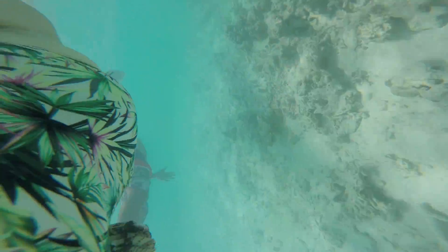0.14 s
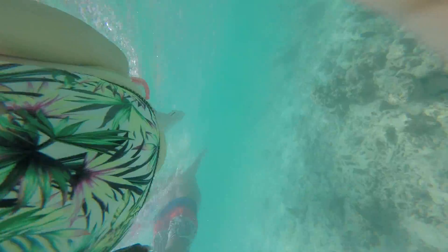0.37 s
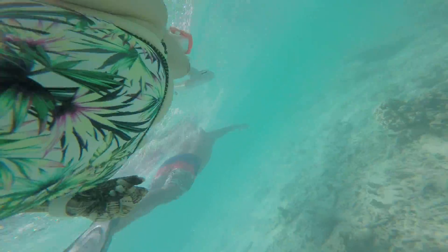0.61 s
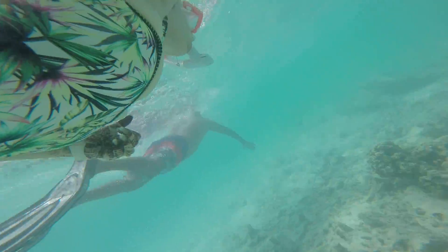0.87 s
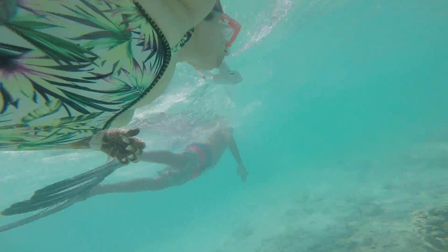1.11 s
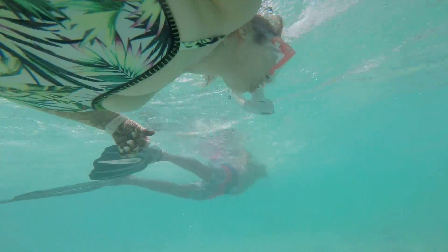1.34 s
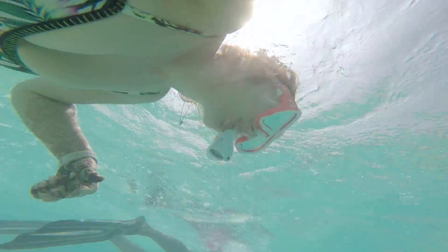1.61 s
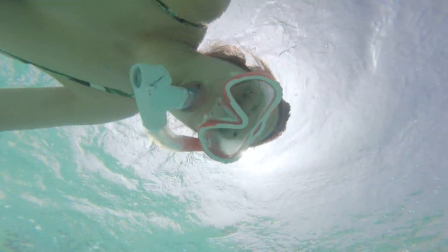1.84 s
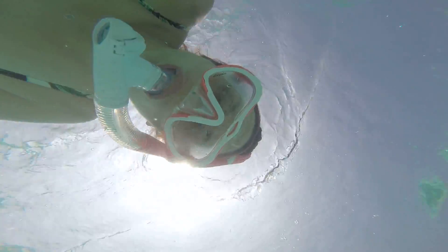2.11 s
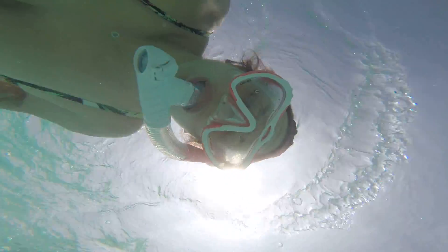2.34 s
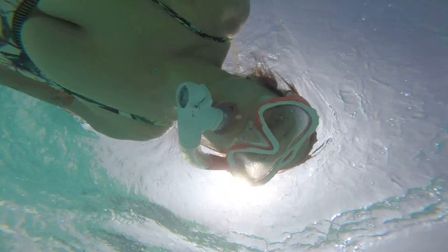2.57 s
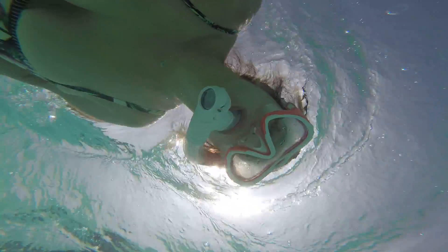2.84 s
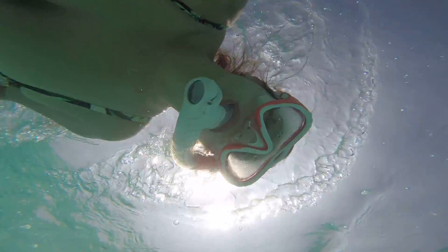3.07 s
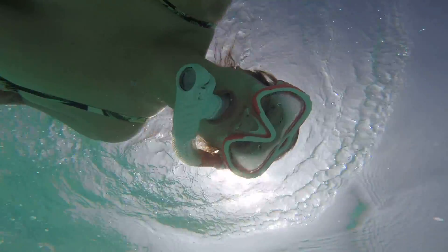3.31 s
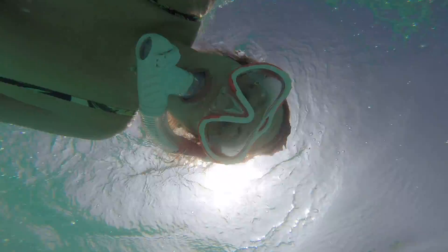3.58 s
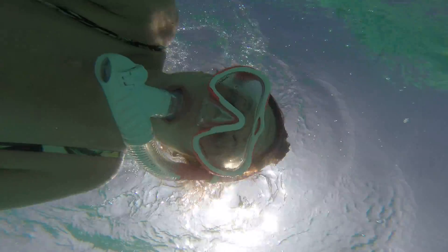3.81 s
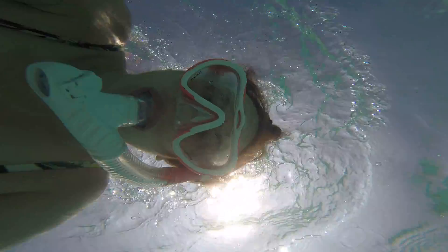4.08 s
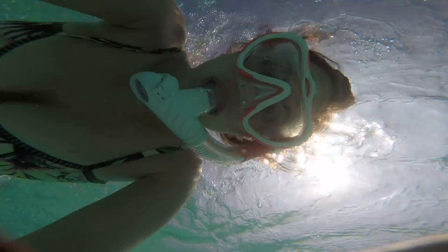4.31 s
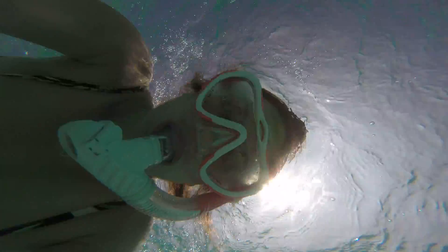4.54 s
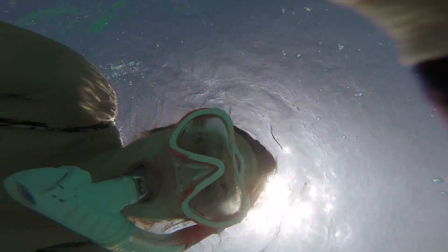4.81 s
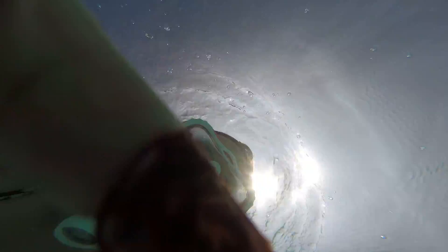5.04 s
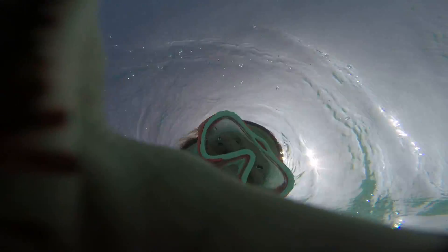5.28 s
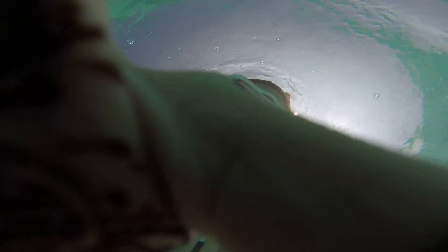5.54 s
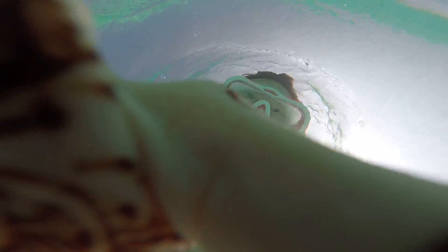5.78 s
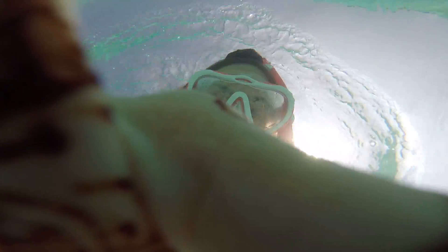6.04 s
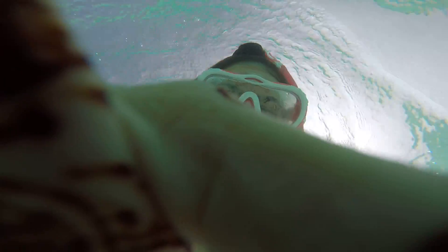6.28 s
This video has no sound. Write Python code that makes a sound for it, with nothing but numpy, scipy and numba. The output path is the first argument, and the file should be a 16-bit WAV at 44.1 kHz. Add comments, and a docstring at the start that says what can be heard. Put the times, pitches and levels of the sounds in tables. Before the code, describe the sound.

A small sealed camera is swung about under the sea surface. A dense, hollow gurgle opens with a rub and low rush, then thins by one second as hard knocks hit the case. Quieter bubble blips and watery wash follow, until heavy thumps and clacks near four seconds. Bubbling swells again after five seconds, with a rub and one sharp knock. Everything is muffled, close and boxy.

```python
"""Bubbles and fizz reach the microphone of a small camera that a swimmer swings about under the sea surface.
They are swarms of damped, rising tones; most of them pass through the resonances of the sealed housing.
Swirling water is gusty low noise, and pushes on the membrane are slow bumps that swing back past rest.
Knocks ring the modes of the case under a crack, brushes are short bursts of coloured noise, and the
electronics whine in faint sines. A limiter ducks the loud moments and the hardest peaks clip."""
import sys
import numpy as np
from scipy import signal
from scipy.fft import rfft, irfft, next_fast_len
from scipy.io import wavfile
from scipy.ndimage import uniform_filter1d
from numba import njit

SR = 44100
rng = np.random.default_rng(int(sys.argv[2]) if len(sys.argv) > 2 else 0)


def wav_record(signal):
    """Record a signal, one row per channel, as 16-bit PCM in the file named by sys.argv[1]."""
    frames = np.transpose(np.atleast_2d(signal))
    bounded = np.clip(frames, -1, 1)
    # unit amplitude maps onto the largest positive 16-bit level
    quanta = np.round(bounded * 32767).astype(np.int16)
    wavfile.write(sys.argv[1], SR, quanta)


def how_loud(loudness_db):
    """Turn decibels into a plain amplitude multiplier (0 dB gives 1, 20 dB gives 10)."""
    steps = np.asarray(loudness_db, float) / 20
    return 10 ** steps


N = 282223  # samples in the scene


def level(x, db):
    """Scale to an rms level."""
    return x * how_loud(db) / np.sqrt(np.mean(x ** 2))


def coloured(spectrum):
    """Noise shaped to a spectrum drawn over log frequency, rms 1."""
    hz, db = np.transpose(spectrum)
    size = next_fast_len(N)
    bin_hz = np.arange(size // 2 + 1) * SR / size + 1e-3  # keeps the log finite at 0 Hz
    gain = how_loud(np.interp(np.log(bin_hz), np.log(hz), db))
    white = rng.standard_normal(size)
    return level(irfft(rfft(white) * gain, size)[:N], 0)


def walk(rate):
    """Random levels, each held 1 / rate s, then smoothed twice into a wander with a spread near 1."""
    hold = int(SR / rate)
    steps = np.repeat(rng.standard_normal(N // 50)[:N // hold + 1], hold)
    return 1.3 * uniform_filter1d(uniform_filter1d(steps, hold), hold)[:N]


def hump(t, rise, fall):
    """A bell with its own rise and fall widths, 1 at t = 0."""
    return np.exp(-.5 * (t / np.where(t < 0, rise, fall)) ** 2)


@njit
def ring(n, at, hz, size, t60, glide, rise):
    """Damped tones that swell over rise s and slide in pitch by the share glide during their t60."""
    out = np.zeros(n)
    for k in range(len(at)):
        start, length, phase = int(at[k] * SR), int(t60[k] * SR), 0.
        for i in range(min(length, n - start)):
            phase += 2 * np.pi * hz[k] * (1 + glide * i / length) / SR
            decay = 1000. ** (-i / length)
            swell = 1 - np.exp(-i / (rise * SR))
            out[start + i] += size[k] * np.sin(phase) * decay * swell
    return out


# water around the case, as breakpoints; the two bubble supplies are trimmed again for each bubble size:
# time_s [s], large_bubbles_db [dB], fine_bubbles_db [dB], flow_past_membrane_db [dB]
WATER_COURSE = [(0.0, -35.5, -42, -29.5), (0.16, -39.5, -49.5, -42), (0.3, -39.5, -46.5, -43),
                (0.48, -40.5, -52.5, -38.5), (1.0, -55.5, -53, -40), (1.14, -64, -55.5, -37),
                (1.32, -56, -57, -47.5), (1.49, -46.5, -56.5, -43), (1.69, -46, -52.5, -42),
                (2.07, -45, -47.5, -38.5), (2.42, -43.5, -47.5, -39), (2.58, -47, -51, -45.5),
                (2.78, -56.5, -52, -43.5), (3.12, -45.5, -47, -37.5), (3.33, -56.5, -54, -35.5),
                (3.56, -54, -53, -44), (3.83, -50.5, -56.5, -31.5), (3.94, -55, -45.5, -33.5),
                (4.13, -47, -55.5, -42.5), (4.37, -47.5, -51.5, -62), (4.51, -47, -57, -46),
                (4.7, -49.5, -55, -40.5), (4.94, -48, -63, -40.5), (5.08, -46, -58, -36.5),
                (5.22, -38.5, -48, -37), (5.38, -39, -49.5, -36), (5.69, -46, -47, -40.5),
                (5.92, -49.5, -50.5, -44.5), (6.15, -39.5, -52, -47.5), (6.4, -44, -54, -42.5)]


def water_course():
    """Levels of large bubbles, fine bubbles and flow, gliding between the breakpoints."""
    time_s, *columns = np.transpose(WATER_COURSE)
    return [np.interp(np.arange(N) / SR, time_s, column) for column in columns]


# resonances of the sealed housing: pitch_hz [Hz], width_hz [Hz], level_db [dB, relative]
HOUSING_RESONANCES = [(711, 81, -6.5), (1800, 430, -12), (2498, 324, -5.5), (4340, 1060, -19),
                      (6390, 730, -16.5), (10400, 1400, -24)]


def housing(x):
    """The sealed air and walls of the housing pass sound mostly at their resonances."""
    out, sign = 0, 1
    for hz, width_hz, db in HOUSING_RESONANCES:
        out = out + sign * how_loud(db) * signal.lfilter(*signal.iirpeak(hz, hz / width_hz, SR), x)
        sign = -sign  # neighbouring resonances answer in opposite phase
    return out


def swarm(patches, count, low_hz, high_hz, cycles, spread_db, patchy_db):
    """Bubbles of random size and moment, rising in pitch; patches sway their level by patchy_db."""
    at, pitch, size = rng.random((count, 3)).T
    hz = low_hz * (high_hz / low_hz) ** pitch
    patch = patches[(at * (N - 1)).astype(int)]
    sizes = how_loud(-spread_db * np.log(1 - .998 * size) + patchy_db * patch)
    return ring(N, at * N / SR, hz, sizes, cycles / hz, 0.35, 0.00015)  # smaller ones die away sooner


# colour of the far wash: pitch_hz [Hz], density_db [dB per Hz, relative]
WASH_SPECTRUM = [(530, -12.5), (900, -0.5), (1160, -24.5), (1820, -7.5), (2020, -25), (2360, -7),
                 (2860, -23), (10300, -35), (14400, -42.5), (15500, -47)]


def wash(clouds):
    """Far wash: coloured noise that sways with the clouds of fine bubbles."""
    return coloured(WASH_SPECTRUM) * how_loud(-53 + 1.4 * clouds)


def bubbling(large_db, fine_db):
    """Four sizes of bubbles: gurgle is steady, large follow one supply, small and fizz the other."""
    slosh = walk(14)
    clouds = .7 * (walk(24) + walk(70))
    gurgle = swarm(slosh, count=500, low_hz=142.4, high_hz=461, cycles=17.5, spread_db=2.2, patchy_db=-2.0)
    large = swarm(slosh, count=1700, low_hz=407.7, high_hz=1169, cycles=46.0, spread_db=-0.5, patchy_db=0.5)
    small = swarm(clouds, count=5000, low_hz=1157, high_hz=3198, cycles=55.5, spread_db=3.0, patchy_db=4.0)
    fizz = swarm(clouds, count=20000, low_hz=2927, high_hz=13300, cycles=25, spread_db=3.5, patchy_db=2.5)
    snaps = swarm(clouds, count=250, low_hz=4000, high_hz=13000, cycles=5, spread_db=2.5, patchy_db=2.4)
    fine = level(housing(fizz), 0) + level(housing(snaps), -18)
    out = level(gurgle, -54)
    out = out + how_loud(large_db + 2) * level(housing(large), 0)
    out = out + how_loud(fine_db - 1.1) * level(housing(small), 0)
    out = out + how_loud(fine_db - 9) * fine
    return out + wash(clouds)


# colour of the swirl: pitch_hz [Hz], density_db [dB per Hz, relative]
SWIRL_SPECTRUM = [(8.8, -55), (15, 8), (70, -7), (141, -15.5), (189, -25), (300, -24), (390, -26.5),
                  (660, -120)]


def swirl(flow_db):
    """Water swirling past pushes on the membrane as low noise; its eddies come in gusts."""
    return coloured(SWIRL_SPECTRUM) * how_loud(flow_db + 3.4 * walk(24))


# tones of the circuit: pitch_hz [Hz], level_db [dB rms before the swell], swell_db [dB]
WHINES = [(5844, -83, 1), (8781, -83, 4), (11688, -93, 0), (11718, -93, 0), (14625, -97, 0)]


def electronics():
    """Thin sines of the circuit; some swell once."""
    t = np.arange(N) / SR
    swell = hump(t - 3.3, .45, .45)
    out = np.zeros(N)
    for hz, db, swell_db in WHINES:
        out += np.sqrt(2) * how_loud(db + swell_db * swell) * np.sin(2 * np.pi * hz * t)
    return out


# colour of the rubbing: pitch_hz [Hz], density_db [dB per Hz, relative]
BRUSH_SPECTRUM = [(320, -61), (550, -10.5), (707, -3), (1000, -21), (1220, -20), (1660, -19), (2520, -19),
                  (2860, -27), (6250, -34), (7500, -42.5), (9910, -42.5), (14500, -56), (15500, -69)]
# something brushes the case: peak_s [s], level_db [dB before the grit], rise_s [s], fall_s [s]
BRUSH_STROKES = [(0.028, -30, 0.035, 0.019), (.501, -36.5, 0.0087, 0.011), (.76, -45, 0.073, .015),
                 (1.07, -38.5, 0.0067, 0.0055), (1.123, -44, 0.013, 0.01), (3.06, -49.5, 0.016, 0.035),
                 (3.735, -47.5, 0.048, .01), (3.916, -33, 0.0064, 0.0081), (4.29, -46, 0.068, 0.01),
                 (4.579, -44, 0.0056, .012), (4.901, -43.5, .02, 0.029), (5.079, -33.5, 0.049, 0.049),
                 (5.19, -45, 0.013, 0.022), (5.714, -43.5, 0.012, 0.015), (5.849, -42, 0.0066, 0.0028)]


def brushes():
    """Short gritty rubs along the case: coloured noise with an unsteady level."""
    t = np.arange(N) / SR
    strokes = sum(how_loud(db) * hump(t - peak_s, rise_s, fall_s) for peak_s, db, rise_s, fall_s in BRUSH_STROKES)
    return coloured(BRUSH_SPECTRUM) * how_loud(1.2 * walk(82)) * strokes


# bubbles that stand out: start_s [s], level_db [dB, relative], pitch_hz [Hz at the start],
# t60_s [s, held within limits when played]
CLOSE_BUBBLES = [(0.014, -18, 260, 0.014), (0.023, -29.5, 1726, 0.066), (0.053, -29, 440, 0.1),
                 (0.0682, -22, 2610, 0.0084), (0.092, -25, 825, 0.019), (0.127, -38, 2430, .016),
                 (0.129, -36.5, 457, 0.29), (0.131, -23, 713, 0.027), (0.156, -37, 3560, .014),
                 (0.182, -34.5, 3430, 0.012), (0.17, -39, 2300, .025), (0.2175, -27, 792, 0.046),
                 (0.249, -31.5, 362, 0.077), (0.251, -27.5, 599, .1), (0.3057, -36, 1800, 0.049),
                 (0.3257, -32.5, 2345, 0.032), (0.3521, -34, 2260, 0.047), (0.3765, -30.5, 1280, .025),
                 (0.413, -32.5, 1800, 0.022), (0.508, -15, 693, .05), (0.547, -28, 644, 0.11),
                 (0.687, -17, 590, 0.014), (0.79, -42.5, 3800, .015), (0.83, -34.5, 800, .07),
                 (0.89, -44, 4100, 0.027), (0.906, -36.5, 677, 0.14), (1.1194, -25.5, 2410, 0.0097),
                 (1.1267, -33, 3330, .012), (1.429, -37.5, 240, .036), (1.6177, -23.5, 2370, 0.009),
                 (1.653, -27.5, 696, 0.04), (1.715, -32, 745, 0.057), (1.719, -37.5, 280, 0.13),
                 (1.8218, -32, 2180, 0.019), (2.041, -30, 783, .042), (2.235, -31, 605, 0.065),
                 (2.2588, -34, 2350, .073), (2.3486, -37, 3700, 0.015), (2.404, -24.5, 762, .029),
                 (2.4269, -32, 2445, .035), (2.439, -22, 866, 0.028), (2.455, -31.5, 783, 0.17),
                 (2.566, -30.5, 790, 0.065), (2.858, -28, 670, 0.052), (2.8659, -38.5, 1850, .03),
                 (2.97, -32.5, 934, 0.036), (3.1093, -35, 4320, 0.012), (3.2869, -33.5, 2440, 0.063),
                 (3.1348, -39, 1560, 0.03), (3.655, -38.5, 2170, 0.065), (3.663, -43, 1880, .06),
                 (3.74, -24, 621, 0.093), (3.824, -28, 660, 0.046), (4.092, -23.5, 577, 0.078),
                 (4.334, -30, 772, 0.052), (4.425, -27, 700, 0.082), (4.4618, -21.5, 2120, 0.0094),
                 (4.4877, -39, 1780, 0.047), (4.711, -29, 664, 0.051), (4.95, -29, 714, 0.066),
                 (5.1, -27, 711, 0.16), (5.222, -39, 1800, .06), (5.2345, -34, 2620, .015),
                 (5.2839, -30, 2480, 0.016), (5.323, -40, 2560, 0.043), (5.4216, -35.5, 2530, 0.058),
                 (5.6261, -34, 2450, 0.03), (5.672, -22.5, 2530, 0.029), (5.7663, -37.5, 2420, 0.022),
                 (5.8117, -28.5, 2240, 0.026), (5.919, -28.5, 756, .06), (5.947, -23.5, 692, 0.063),
                 (5.959, -26.5, 668, 0.099), (5.9843, -36.5, 3070, 0.019), (6.0482, -42, 3340, .013),
                 (6.064, -40.5, 3300, 0.023), (6.16, -33, 690, 0.033), (6.1804, -33, 2630, 0.023),
                 (6.259, -29, 827, 0.067), (6.3415, -33, 2580, 0.031)]


def bubbles():
    """Single bubbles close to the microphone: damped tones that rise a little in pitch."""
    start_s, db, hz, t60_s = np.array(CLOSE_BUBBLES, float).T.copy()
    return ring(N, start_s, hz, how_loud(db + 3), np.clip(t60_s, .004, .3), 0.11, 0.00099)


# pushes on the membrane: peak_s [s], peak [share of full scale, minus = outward],
# rise_ms [ms], fall_ms [ms], rebound_ms [ms]
MEMBRANE_PUSHES = [(0.062, -0.098, 8.6, 6.1, 20), (0.163, -.079, 3.4, 5.1, 24), (0.4254, 0.12, 2.1, 4.4, 2),
                   (0.7009, .376, 1.8, 1.14, 2.4), (0.866, -0.12, 2.7, 0.9, 13),
                   (0.8692, 0.26, 1.15, 2.9, 6.2), (1.065, -.063, 3.5, 3.6, 11),
                   (1.0788, .112, 2.3, 6.9, 24), (1.152, -1.05, .5, .6, 2.4), (1.157, .14, 1.5, 4, 30),
                   (1.534, -0.056, 2.7, 3, 7.3), (2.7355, 0.083, 1.3, 5.1, 7),
                   (3.182, -.15, 6.6, 17.4, 11.4), (3.198, -.1, 1.7, .58, 9.2), (3.3, -0.098, 9.5, 14, 35),
                   (3.404, 0.03, 18.3, 9.6, 10.4), (3.503, -0.074, 1.9, 6.2, 18),
                   (3.592, .067, 4.3, 13, 79), (3.751, .2, 2.5, 2.1, 15), (3.7549, .95, 1.3, 4.2, 10),
                   (3.785, -0.12, 11, 6.2, 50), (3.849, 0.093, 13, 6, 32), (3.8612, 0.54, 2.3, 1.04, 3.1),
                   (3.908, 0.09, .89, 3, 11), (3.922, -0.13, 0.33, 24, 22), (3.974, 0.093, 0.63, 0.91, 1.1),
                   (4.354, -.106, 1.34, 2.9, 6.2), (4.376, .133, 4.9, 5.2, 42),
                   (4.3844, -0.3, 3.9, 4.3, 10.5), (4.417, -.106, 2.9, 11, 24),
                   (5.183, -.063, 5.8, 7.7, 7.5), (5.352, -0.022, 3, 5.3, 6.6),
                   (5.87, -.03, 1.1, 0.83, 2.2)]


def pushes():
    """Each push bulges the membrane; trapped air leaks after it, so it swings back past rest."""
    out = np.zeros(N + SR)
    ms = np.arange(-.04, .3, 1 / SR) * 1000
    for peak_s, peak, rise_ms, fall_ms, rebound_ms in MEMBRANE_PUSHES:
        push = hump(ms, rise_ms, fall_ms)
        keep = np.exp(-1000 / (rebound_ms * SR))
        leak = signal.lfilter([(1 - keep) ** 2], [1, -2 * keep, keep ** 2], push)
        felt = push - leak
        i = int(peak_s * SR) - felt.argmax()
        out[i:i + len(ms)] += peak * felt / felt.max()
    return out[:N]


# ringing modes of the case: pitch_hz [Hz before detuning], level_db [dB, relative], t60_s [s before stretch]
CASE_MODES = [(460, 18, 0.0068), (670, 4, 0.03), (923, 2, 0.015), (1142, 9, 0.015), (1560, -7, 0.024),
              (1780, -3, 0.018), (2190, -8.5, 0.023), (2610, -2, 0.013), (3300, -6.5, 0.01)]
# knocks on the case: start_s [s], peak_db [dB, of the ringing], region_hz [Hz, modes near it are favoured],
# stretch [factor on t60], crack_db [dB, relative]
CASE_KNOCKS = [(0.638, -27, 1800, 0.52, -40), (0.7674, -20, 990, 1.07, -52),
               (0.9404, -11.5, 1020, 0.42, -56), (1.07, -25.5, 1170, 0.41, -44),
               (1.1505, -9.5, 950, .6, -28), (1.1523, -9.5, 2700, .5, -27), (1.618, -27.5, 2800, 0.34, -38),
               (2.388, -30.5, 3300, 0.52, -38), (3.289, -30, 2370, 0.94, -43),
               (3.7548, -16.5, 2040, 0.41, -36), (3.862, -43, 2010, .48, -34.5),
               (3.9045, -25, 1100, 0.64, -57), (3.9209, -8, 810, 0.48, -22.5),
               (3.947, -20, 1570, 0.41, -52), (3.9729, -18.5, 587, 0.81, -54),
               (5.5746, -11, 1300, 1.08, -51), (5.7028, -24, 2170, 0.97, -52),
               (5.849, -32.5, 1500, 1.4, -46), (6.025, -28, 3300, 0.11, -50), (6.105, -28, 2300, 0.39, -42),
               (6.259, -34.5, 2220, 2.1, -38)]


def knocks():
    """Each blow favours the modes near its own pitch region; they ring under a gritty crack."""
    out = np.zeros(N + SR)
    t = np.arange(SR // 10) / SR
    hz, mode_db, t60_s = np.array(CASE_MODES).T.copy()
    grit = signal.butter(1, [2500, 8000], "band", fs=SR)
    crack_shape = t / 0.00034 * np.exp(1 - t / 0.00026)
    for start_s, peak_db, region_hz, stretch, crack_db in CASE_KNOCKS:
        detune = 1 + .015 * rng.standard_normal(len(hz))
        sizes = how_loud(mode_db - 12 * np.log2(hz / region_hz) ** 2)
        touch = ring(len(t), 0 * hz, hz * detune, sizes, t60_s * stretch, 0., 0.0002)
        # a light touch, then the wall snaps the other way
        hit = .45 * touch - np.roll(touch, int(.0009 * SR))
        crack = signal.lfilter(*grit, rng.standard_normal(len(t))) * crack_shape
        blow = how_loud(peak_db) * hit / np.abs(hit).max() + how_loud(crack_db) * crack
        out[int(start_s * SR):][:len(t)] += blow
    return out[:N]


def scene():
    """Everything that reaches the membrane, and the whine of the circuit."""
    large_db, fine_db, flow_db = water_course()
    water = bubbling(large_db, fine_db) + swirl(flow_db)
    contacts = brushes() + pushes() + knocks()
    return (water + electronics() + bubbles() + contacts)[None]


@njit
def limiter(x, heard, top, release, slew):
    """Peaks above top pull the gain down; it slews there within milliseconds and recovers slowly."""
    y, envelope, gain = np.empty(len(x)), 0., 1.
    for i in range(len(x)):
        envelope = max(abs(heard[i]), envelope * (1 - release))
        gain += (min(1., top / (envelope + 1e-9)) - gain) * slew
        y[i] = x[i] * gain
    return y


def band_limit(x):
    """A steep low-pass at the top of the band."""
    return signal.sosfilt(signal.butter(12, 16420, fs=SR, output="sos"), x)


def record(dry):
    """The limiter listens above the deep bass and is too slow for the hardest peaks, which clip; the top is cut."""
    heard = signal.sosfilt(signal.butter(2, 120, "high", fs=SR, output="sos"), dry[0])
    # release 0.3 s, slew 15 ms
    held = limiter(dry[0], heard, .3, 1 / (.3 * SR), 1 / (.015 * SR))
    cut = signal.sosfilt(signal.ellip(8, .2, 60, 15300, fs=SR, output="sos"), held)
    return band_limit(np.clip(cut, -1, 1)[None])


dry = scene()
out = record(dry)
wav_record(out)
```